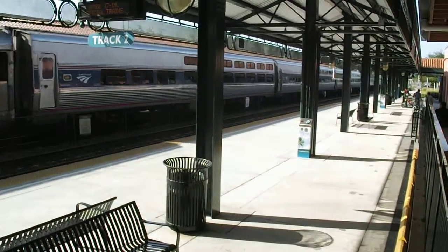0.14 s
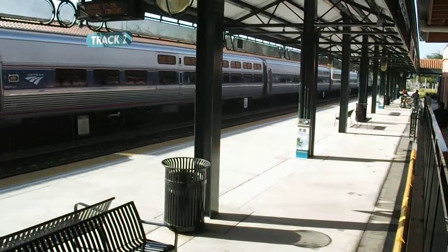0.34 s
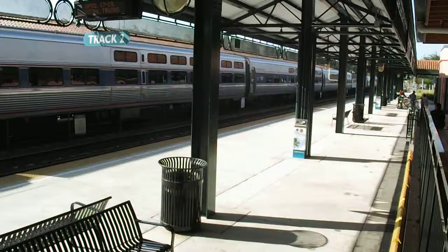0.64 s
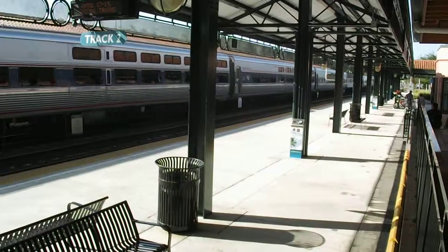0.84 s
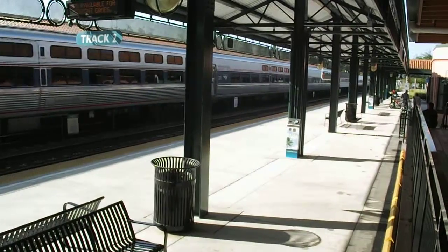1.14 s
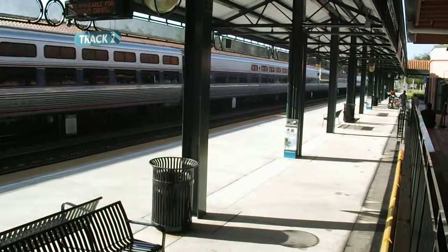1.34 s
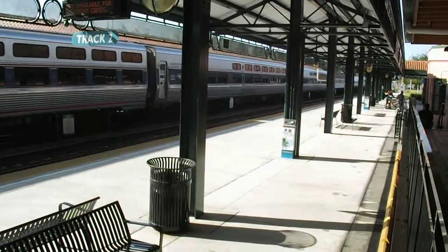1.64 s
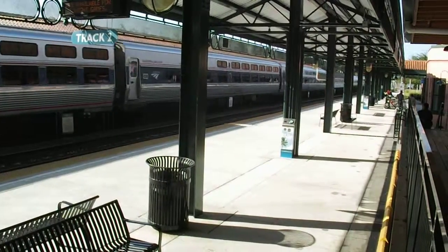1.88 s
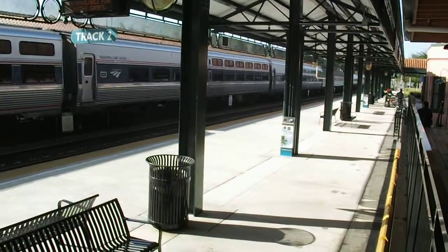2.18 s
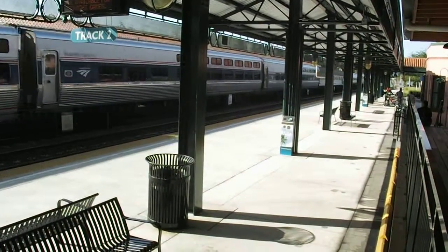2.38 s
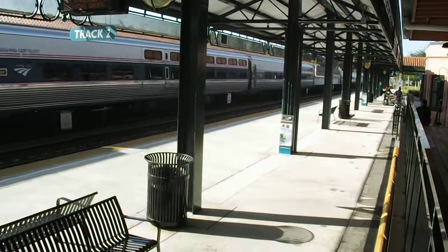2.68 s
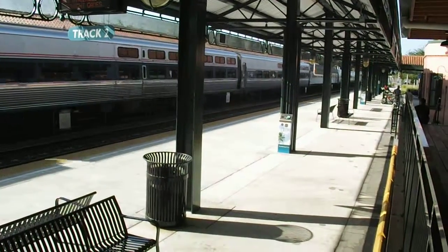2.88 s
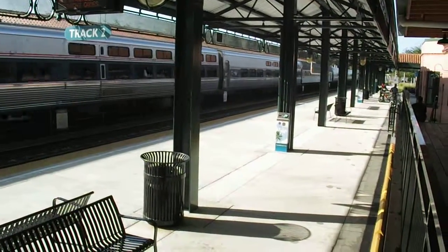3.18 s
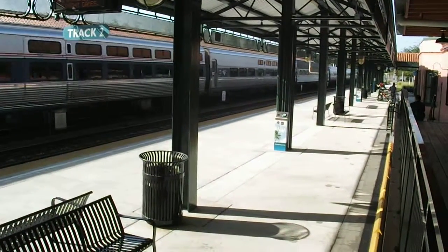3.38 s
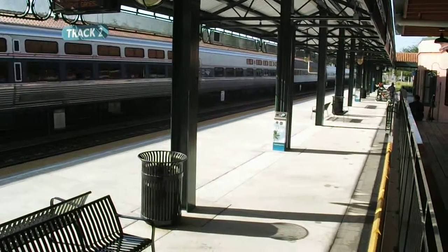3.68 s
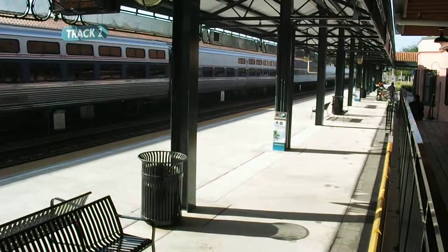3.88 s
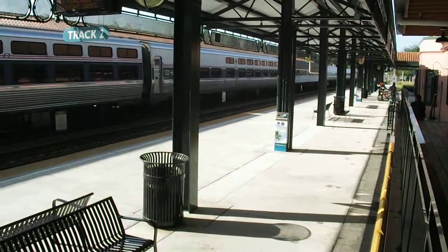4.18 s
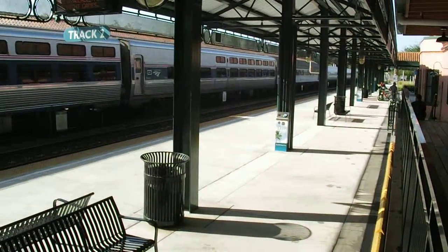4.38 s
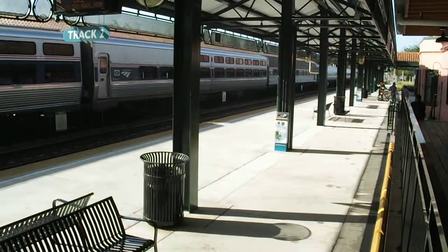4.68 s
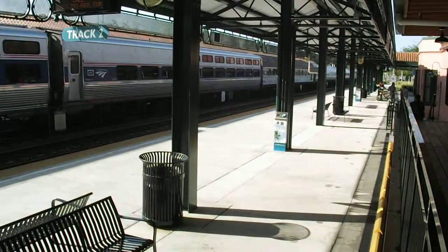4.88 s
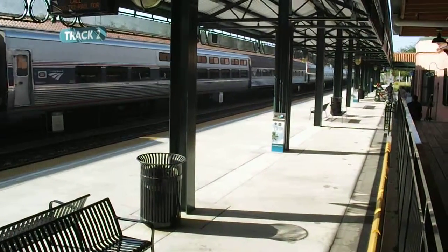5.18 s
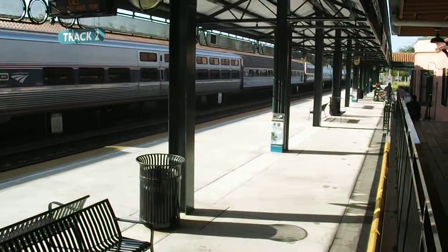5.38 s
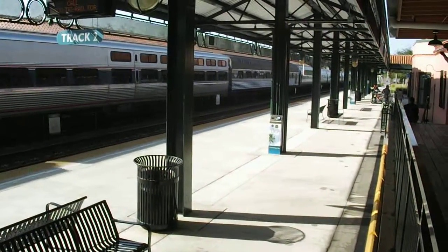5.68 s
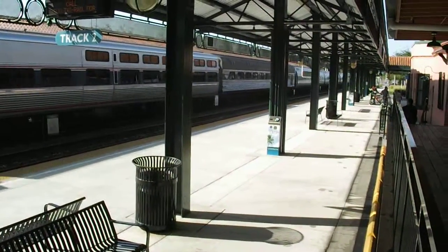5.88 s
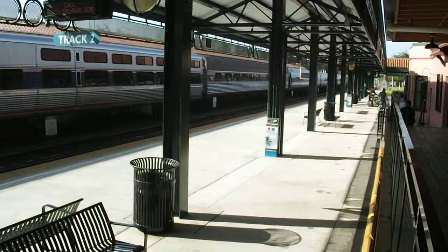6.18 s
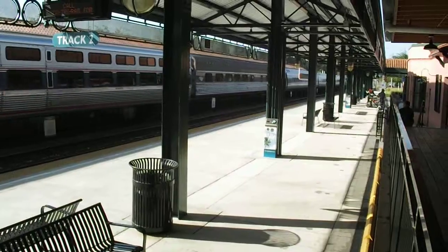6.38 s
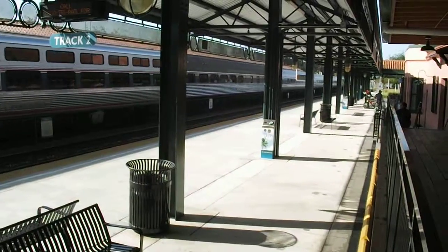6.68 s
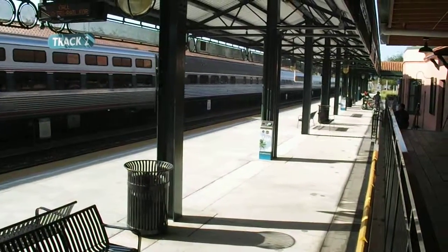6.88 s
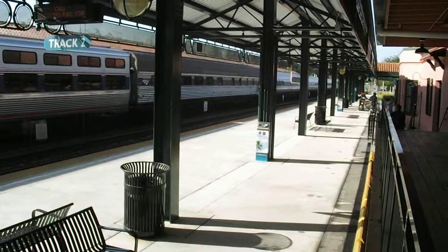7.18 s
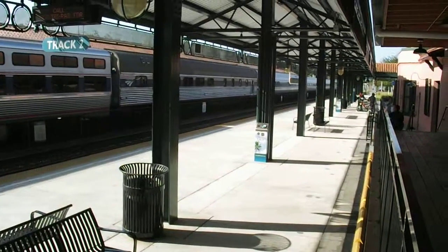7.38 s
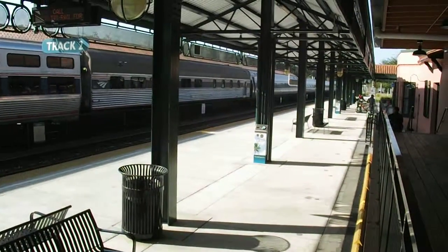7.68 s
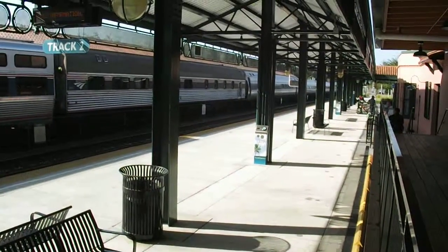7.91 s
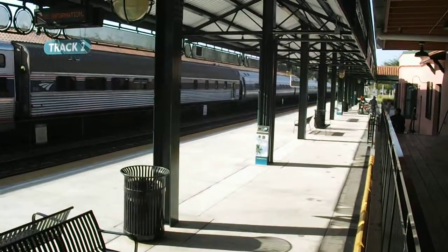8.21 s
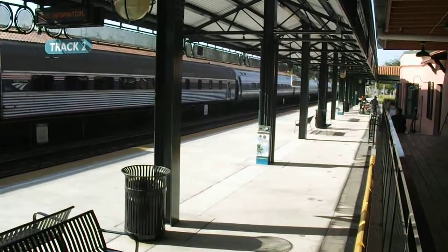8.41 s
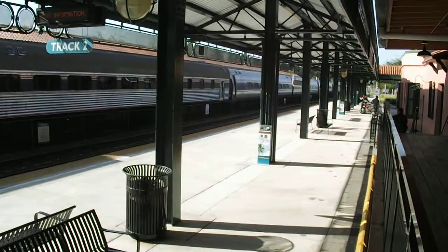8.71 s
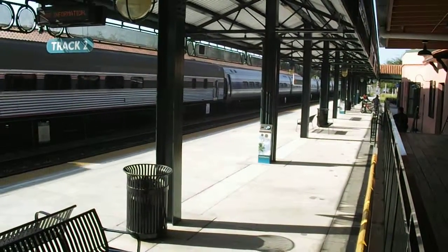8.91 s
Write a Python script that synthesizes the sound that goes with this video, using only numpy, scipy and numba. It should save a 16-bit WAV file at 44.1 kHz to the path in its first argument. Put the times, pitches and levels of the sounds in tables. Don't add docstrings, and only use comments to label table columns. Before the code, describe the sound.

A passenger train rumbles and roars alongside a covered platform, slowing as its brakes squeal louder and turn into a steady, piercing, scraping metallic whine.

```python
import sys
import numpy as np
from scipy import signal
from scipy.fft import rfft, irfft, next_fast_len
from scipy.io import wavfile
from scipy.ndimage import uniform_filter1d
from numba import njit

SR = 44100
rng = np.random.default_rng(int(sys.argv[2]) if len(sys.argv) > 2 else 0)


def put_to_file(sound):
    columns = np.atleast_2d(sound).T
    safe = np.clip(columns, -1, 1)
    whole_steps = np.round(safe * 32767)
    wavfile.write(sys.argv[1], SR, whole_steps.astype(np.int16))


def volts(x):
    e = np.asarray(x, float) / 20
    return 10 ** e


N = 399105
TIME = np.arange(N) / SR


def unit(x):
    return x / np.sqrt(np.mean(x ** 2))


def walk(rate):
    hold = int(SR / rate)
    steps = np.repeat(rng.standard_normal(N // hold + 1), hold)
    smooth = uniform_filter1d(uniform_filter1d(steps, hold), hold)
    return unit(smooth[:N])


def spikes(s, height):
    out = np.zeros(N)
    out[(np.asarray(s) * SR).astype(int)] = height
    return out


@njit
def moving_bandpass(x, g, k):
    y, band, low = np.empty(len(x)), 0., 0.
    for i in range(len(x)):
        v = (band + g[i] * (x[i] - low)) / (1 + g[i] * (g[i] + k[i]))
        band, low, y[i] = 2 * v - band, low + 2 * g[i] * v, k[i] * v
    return y


def rubbed(hz, width_hz):
    hz = hz + np.zeros(N)
    g, k = np.tan(np.pi * hz / SR), 1.23 * width_hz / hz
    noise = rng.standard_normal(N)
    for _ in range(3):
        noise = moving_bandpass(noise, g, k)
    return unit(noise)


def hiss(table, lo_hz, hi_hz, flicker_db, rate):
    size = next_fast_len(N)
    log_hz = np.log(np.maximum(np.fft.rfftfreq(size, 1 / SR), 1))
    hz, db = np.transpose(table)
    log_at = np.log(hz)
    colour = volts(np.interp(log_hz, log_at, db, left=-140, right=-140))
    spectrum = rfft(rng.standard_normal(size)) * colour
    inside = (log_hz > np.log(lo_hz)) & (log_hz < np.log(hi_hz))
    spectrum = spectrum / np.std(irfft(spectrum * inside, size))
    centres = np.linspace(log_at[0], log_at[-1], num=6)
    spacing = centres[1] - centres[0]
    out = np.zeros(N)
    for centre in centres:
        piece = np.clip(1 - abs(log_hz - centre) / spacing, 0, 1)
        out += irfft(spectrum * piece, size)[:N] * volts(flicker_db * walk(rate))
    return out


def wheels(roar_db, rumble_db, ring_db):
    # pitch in Hz, level in dB per Hz.
    roar_colour = [(180, -23), (300, -4), (745, -6.5), (916, -6), (1150, -5), (1890, -7.5), (2080, -8),
                   (3000, -3.5), (3570, -17), (3860, 1.5), (4700, -10.5), (6110, -39), (10300, -120)]
    rumble_colour = [(12, -38.5), (20, -14), (86, 3), (113, -1), (189, 0), (236, -6.5), (268, -2.5),
                     (323, -20), (400, -31.5), (520, -28.5), (880, -120)]
    ring_colour = [(2710, -33), (4600, -17.5), (4720, -3.5), (5850, 1), (6420, -15.5), (6720, -14),
                   (7060, -3), (7800, -18), (8740, -9.5), (10300, -17), (10800, -27.5), (11200, -45.5),
                   (11500, -74), (14900, -106), (22000, -120)]
    # pitch in Hz, width in Hz, level in dB.
    wheel_modes = [
        (265, 25, -18),
        (523, 30, -22),
        (1900, 120, -18),
        (4210, 60, -14),
    ]

    roar = hiss(roar_colour, 350, 2300, 1.2, 11)
    for hz, width_hz, db in wheel_modes:
        roar = roar + volts(db + 3 * walk(6)) * rubbed(hz, width_hz)

    rumble = hiss(rumble_colour, 25, 320, 1.2, 7)

    ring = hiss(ring_colour, 5000, 5550, 1.5, 7) * volts(-2.5)
    ring_hz = 5330 - 25 * TIME + 30 * walk(4)
    ring = ring + volts(-1 + 3 * walk(4.8)) * rubbed(ring_hz, 150)
    turns_per_s = 3.6
    throb = volts(-24 + 9.6 * np.sin(2 * np.pi * turns_per_s * (TIME - .35)))
    throb = throb * np.clip(1 - TIME / 4, 0, 1)
    ring = ring + throb * rubbed(9750, 260)
    ring_db = ring_db + np.interp(TIME, [4, 8.5], [0, -11])
    return roar * volts(roar_db) + rumble * volts(rumble_db) + ring * volts(ring_db)


def squeal(table, waver_hz, flutter_db, halo_hz, halo_db, trim_db, offset_hz=0, bites=()):
    s, hz, db = np.transpose(table)
    pitch = np.interp(TIME, s, hz)
    tone = np.sqrt(2) * np.sin(2 * np.pi * np.cumsum(pitch + waver_hz * walk(45)) / SR)
    tone = tone * unit(volts(flutter_db * walk(45)))
    halo = rubbed(pitch + offset_hz, halo_hz)
    since_start = TIME - s[0] + (s[0] < .1)
    until_end = s[-1] - TIME + (s[-1] > 9)
    fade = np.clip(np.minimum(since_start, until_end) / .3, 0, 1)
    level_db = np.interp(TIME, s, db)
    for middle, half, rise_db in bites:
        level_db = level_db + rise_db * np.exp(-((TIME - middle) / half) ** 4)
    tone = tone * volts(0.5 * (level_db - level_db.max()) + 2.5)
    return (tone + volts(halo_db) * halo) * volts(level_db + trim_db) * fade


def squeals():
    # time in seconds, pitch in Hz, level in dB.
    low_path = [(0.0, 3075, -30), (1.1, 3090, -27), (2.4, 3040, -23.5), (3.0, 3038, -19),
                (3.5, 3022, -19.5), (4.07, 2998, -16), (4.3, 2993, -20), (4.52, 2990, -14.5),
                (5.05, 2982, -17), (5.5, 2972, -13), (6.1, 2945, -16.6), (6.8, 2891, -17),
                (9.05, 2845, -17.3)]
    mid_path = [(0.0, 3860, -25), (0.6, 3833, -25), (1.75, 3690, -26), (2.35, 3630, -24),
                (4.0, 3648, -23.5), (6.44, 3640, -26.5)]
    late_path = [
        (4.3, 3440, -30),
        (5.5, 3390, -24),
        (6.1, 3360, -26),
        (8.7, 3290, -25),
    ]
    thin_path = [(0.0, 4420, -37), (0.5, 4400, -31), (1.7, 4385, -32), (4.33, 4380, -38)]
    edge_path = [(0.0, 4945, -43), (0.6, 4930, -33), (2.2, 4810, -38), (3.6, 4800, -36.5), (5.0, 4725, -43)]
    high_path = [(0.0, 5915, -35), (1.0, 5862, -35), (1.25, 5782, -35), (2.1, 5830, -46.5),
                 (5.8, 5860, -47), (9.04, 5690, -49.5)]
    top_path = [(0.0, 7100, -34), (0.4, 7020, -29.5), (1.5, 6869, -27.3), (2.0, 6810, -31.5),
                (3.0, 6805, -36.5), (5.0, 6788, -54.5)]
    # middle in seconds, half length in seconds, rise in dB.
    mid_bites = [(1.35, .12, 9), (1.6, .1, 1), (2.0, 0.26, 10), (2.36, 0.097, 10.5), (2.616, .15, 6),
                 (3.014, 0.053, 4), (3.267, .12, 6.5), (3.597, 0.13, 3)]
    high_bites = [
        (1.0, .13, 5.6),
        (1.27, 0.026, 6.2),
        (3.58, .36, 13),
        (4.351, 0.18, 9.9),
    ]

    out = squeal(low_path, 12, 5, 140, 1.5, -3.5, offset_hz=-50)
    out += squeal(mid_path, 18, 4, 130, -3.5, .1, offset_hz=30, bites=mid_bites)
    out += squeal(late_path, 5, 3, 50, -5, -2)
    out += squeal(thin_path, 12, 5, 100, .1, -2.5)
    out += squeal(edge_path, 40, 8, 200, 10, -9)
    out += squeal(high_path, 12, 4, 140, -1.5, -.5, offset_hz=-20, bites=high_bites)
    out += squeal(top_path, 50, 6, 300, 6, -3.5)
    return out


def pads(scrape_db, upper_db):
    # pitch in Hz, level in dB per Hz.
    scrape_colour = [(1350, -67), (2300, -50), (2580, -25.5), (2770, -4.5), (2860, 5), (3050, 4), (3300, 2),
                     (3660, 4), (4710, -19.5), (4860, -64), (5200, -73), (6760, -80.5), (11400, -120)]
    upper_colour = [(3180, -43), (5400, -32.5), (5570, -1), (5880, -4.5), (6050, -5.5), (6910, -1.5),
                    (7610, 3.5), (8830, -4.5), (9200, -14), (11500, -27), (14900, -55), (22000, -120)]
    # pitch at the start in Hz, level in dB.
    strands = [(3240, -9.5), (3350, -9), (3500, 1.5), (3580, -5.5), (3660, -15), (3750, -0.5), (3840, -7.5),
               (3920, 0), (4030, -5), (4140, -9), (4280, -4), (4780, -36.5)]

    grip_db = np.interp(TIME, [0, 3.4, 4.4, 6], [-13.5, -6.0, -5.5, -1.5])
    lower = hiss(scrape_colour, 3991, 4140, 1.1, 21) * volts(-1.5)
    for start_hz, db in strands:
        strand_hz = start_hz - 15 * TIME + 30 * walk(6)
        lower = lower + volts(db + .5 + 3.3 * walk(16)) * rubbed(strand_hz, 26)
    upper = hiss(upper_colour, 7760, 8600, 2.2, 10)
    return lower * volts(scrape_db + grip_db) + upper * volts(upper_db + 0.38 * grip_db)


def arch():
    start_s, end_s = 7.3, 8.0
    on = np.clip(np.minimum(TIME - start_s, end_s - TIME) / .1, 0, 1)
    arches_per_s = 2.4
    hz = 4540 + 110 * abs(np.sin(np.pi * arches_per_s * (TIME - start_s)))
    return volts(-37 + 2 * walk(20)) * on * rubbed(hz, 35)


def pad_catches(s, db):
    lag = np.arange(-100, 101) / SR
    edge = .06 * np.exp(-(lag / .00015) ** 2)
    burst = np.exp(-(lag / .0006) ** 2) * (np.cos(2 * np.pi * 3400 * lag) + edge)
    growth = np.clip(s / 4.6, 0, 1) ** 2
    return np.convolve(spikes(s, volts(0.18 * db + 6.5) * growth), burst, "same")


def joints():
    # time in seconds, peak level in dB.
    knocks = [
        (4.579, -16),
        (4.889, -21),
        (6.192, -20),
        (6.579, -22.5),
    ]
    s, db = np.transpose(knocks)
    decay_s = 0.048
    swell = signal.lfilter([1], [1, -np.exp(-1 / (decay_s * SR))], spikes(s - .02, volts(db - 6)))
    return uniform_filter1d(swell, size=600) * rubbed(200, 140)


def ground():
    return volts(-44.5) * rubbed(38, 45)


def air():
    # pitch in Hz, level in dB per Hz.
    air_colour = [(9000, -29.5), (10500, -3.5), (13000, -4.5), (16000, -9), (17000, -35)]
    puff_db = 12 * np.exp(-((TIME - 2.8) / 0.28) ** 2)
    return hiss(air_colour, 9600, 16000, 5.3, 7.5) * volts(-67 + puff_db)


def scene():
    # time in seconds, rolling noise in
    # dB, pad pressure in dB.
    train_levels = [(0.0, -23.5, -32), (0.4, -23, -29), (1.0, -24.5, -31), (1.5, -24.5, -31),
                    (2.0, -26, -33), (2.68, -26.5, -31), (3.02, -24.5, -27.5), (3.5, -25.5, -31),
                    (4.02, -26.5, -28.5), (4.4, -29, -31.5), (5.03, -33, -32), (5.36, -30.5, -29),
                    (6.03, -36.5, -33.5), (6.6, -35.5, -31), (7.04, -36, -28.5), (7.5, -37, -29.5),
                    (8.3, -43.5, -31), (9.05, -45, -30)]
    s, rolling, pressure = np.transpose(train_levels)
    roar_db = np.interp(TIME, s, rolling)
    scrape_db = np.interp(TIME, s, pressure)
    swell_db = scrape_db - scrape_db.mean()
    rumble_db = np.maximum(-19.5 + 1.18 * (roar_db - roar_db[0]), -36)
    ring_db = np.interp(TIME, [1.52, 5.3], [-31, -49]) + 0.85 * swell_db
    upper_db = -41 + .6 * swell_db

    train = wheels(roar_db, rumble_db, ring_db) + squeals() + pads(scrape_db, upper_db)
    train = train + arch() + joints() + ground() + air()
    return np.array([train, train])


@njit
def leveller(x, top, slope, attack, release):
    y, envelope = np.empty(len(x)), top
    for i in range(len(x)):
        rate = attack if abs(x[i]) > envelope else release
        envelope += (abs(x[i]) - envelope) * rate
        y[i] = x[i] * min(1., top / envelope) ** slope
    return y


def top_cut(x):
    return signal.sosfilt(signal.butter(12, 15900, fs=SR, output="sos"), x)


def record(dry):
    # time in seconds, gain drop in dB, tick level in dB.
    snaps = [(0.3702, -5, -60), (0.9168, -4.6, -57), (1.2798, -4.5, -61), (1.8548, -5.4, -50),
             (2.2676, -4, -50), (2.3732, -4.5, -57), (2.5414, -6.3, -53), (2.9711, -5.9, -55),
             (3.0613, -4.6, -59), (3.2742, -4.2, -45), (3.5848, -5.6, -69), (3.8977, -5.1, -69),
             (4.1046, -5.1, -49), (4.4332, -5.4, -61), (4.6111, -5.8, -53), (4.9276, -5.8, -60),
             (5.1183, -4.2, -47), (5.2375, -5.4, -63), (5.3428, -5.5, -60), (5.5223, -8.1, -57),
             (5.7196, -6.5, -52), (6.6413, -3.6, -40), (6.8135, -3.8, -45), (7.0009, -5, -60),
             (7.2931, -5.2, -47), (7.5776, -5.2, -40), (7.9342, -5.9, -46), (8.5076, -4.4, -52),
             (8.7632, -5.2, -60), (8.8702, -4.3, -41)]
    nudges_s = [0.1304, 0.5357, 1.0252, 1.1176, 1.7069, 1.9789, 2.1413, 2.6614, 2.818, 3.1928, 3.696,
                3.7857, 4.0134, 4.6722, 5.3953, 5.9188, 5.9993, 6.2222, 6.2835, 6.4239, 6.6888, 6.9127,
                7.0629, 7.7436, 7.8213, 8.0652, 8.3011, 8.4017, 8.6187, 8.9519]
    # time in seconds, peak level in dB.
    more_ticks = [(5.3953, -51), (5.622, -35), (6.2835, -52), (6.4239, -52), (6.6888, -49), (7.0629, -53),
                  (7.6403, -52), (7.7436, -45), (7.8213, -42), (8.192, -45), (8.287, -48), (8.5711, -43),
                  (8.6187, -57), (8.6854, -56), (8.7198, -45), (8.9519, -48), (9.0088, -48)]

    s, drop_db, tick_db = np.transpose(snaps)
    nudge_db, recover_s = -3, 0.087
    drops = spikes(s, drop_db) + spikes(nudges_s, nudge_db)
    gain_db = signal.lfilter([1], [1, -np.exp(-1 / (recover_s * SR))], drops)
    gain_db = uniform_filter1d(gain_db, size=30)
    attack, release = 1 / (0.00076 * SR), 1 / (.06 * SR)
    x = leveller(dry[0] * volts(gain_db + 1.0), 0.47, 0.6, attack, release)

    at, db = np.concatenate([[s, tick_db], np.transpose(more_ticks)], axis=1)
    late_rise_db = 6.5 * np.clip(at - 6.6, 0, 1.5)
    ticks = spikes(at, volts(db + 14 + late_rise_db))
    x = np.clip(x + pad_catches(at, db) - ticks, -1, 1)

    late = np.roll(x, 1)
    mid, side = (late + x) / 2, (late - x) / 2
    side = signal.sosfiltfilt(signal.butter(2, 850, "high", fs=SR, output="sos"), side)
    return top_cut(np.array([mid + side, mid - side]))


dry = scene()
out = record(dry)
put_to_file(out)
```